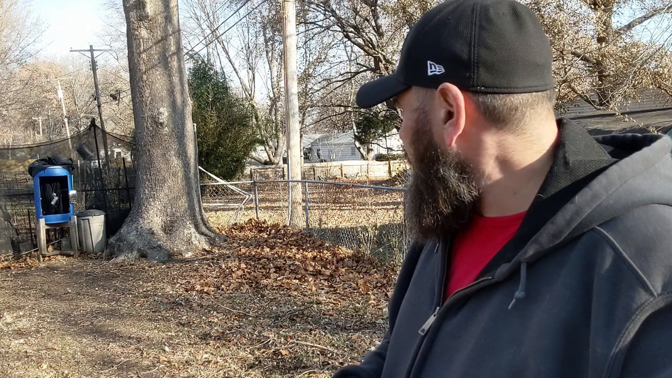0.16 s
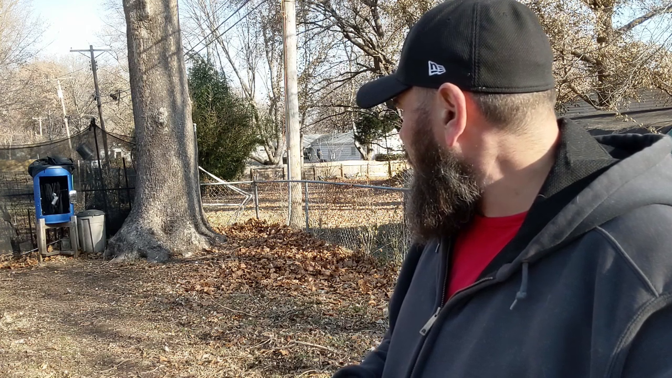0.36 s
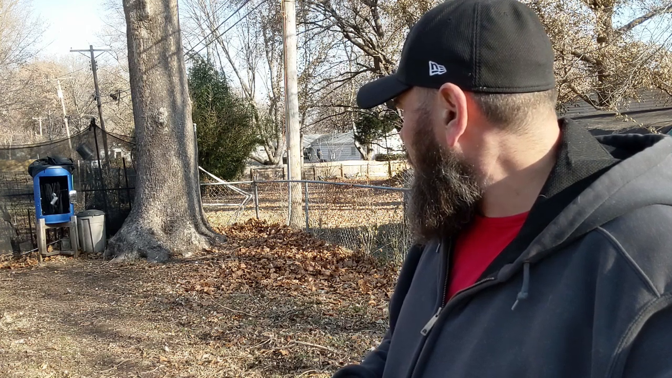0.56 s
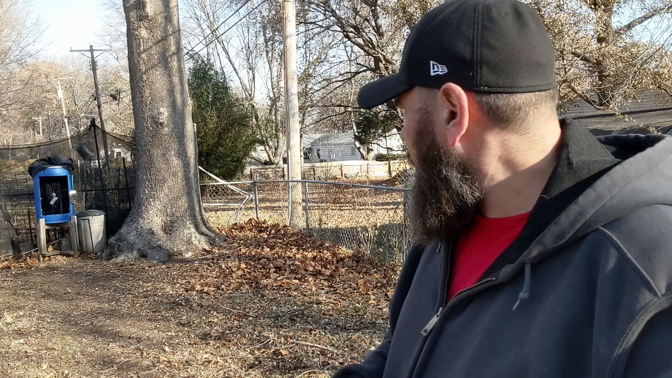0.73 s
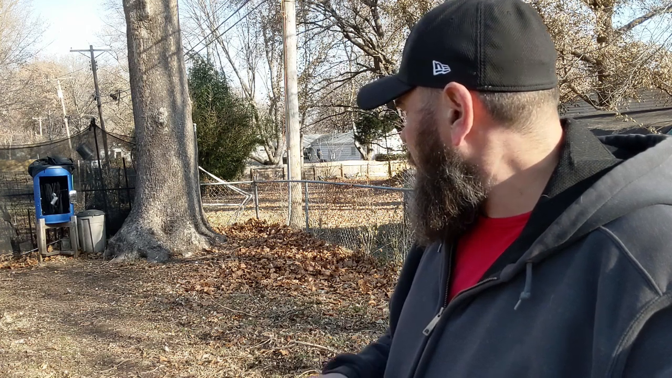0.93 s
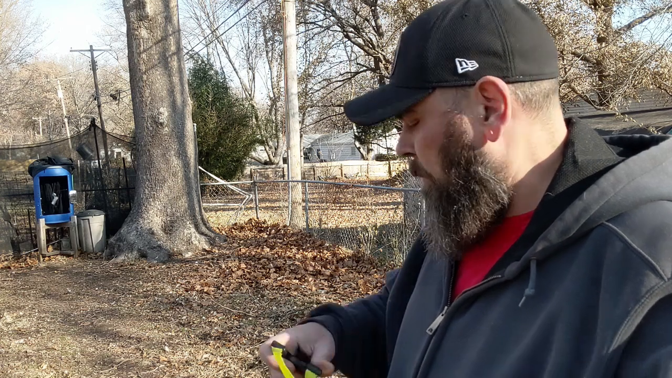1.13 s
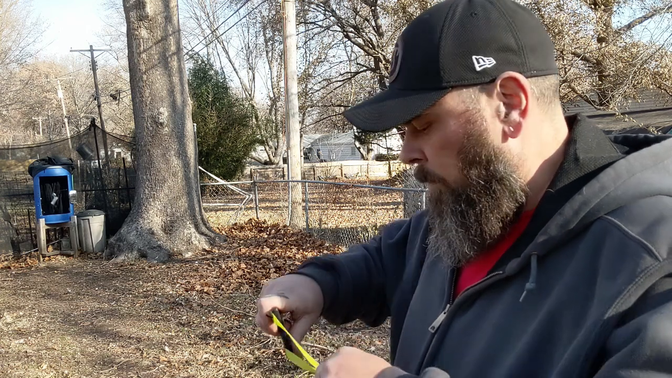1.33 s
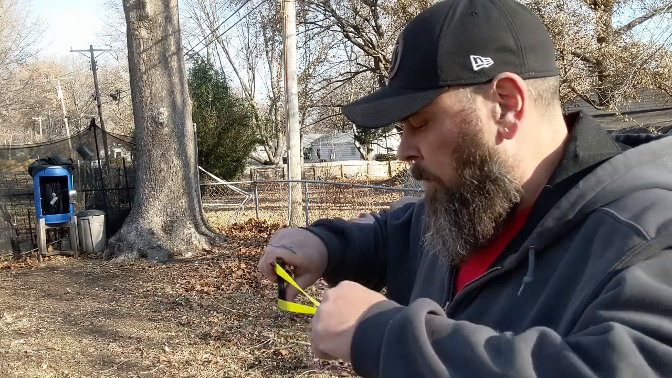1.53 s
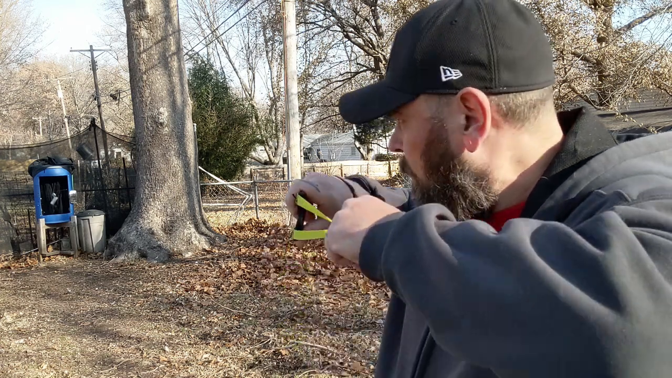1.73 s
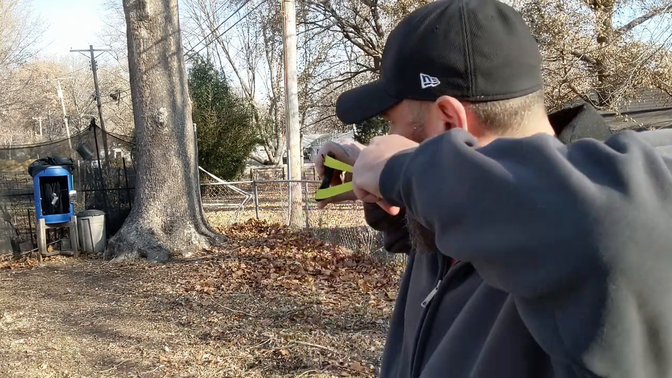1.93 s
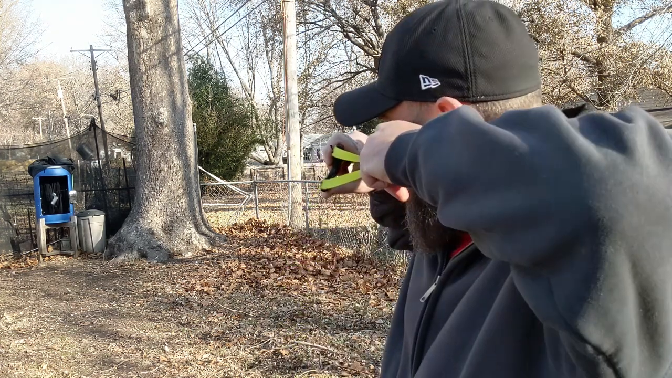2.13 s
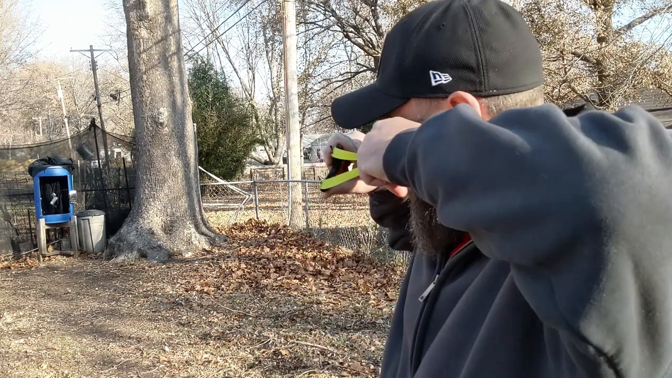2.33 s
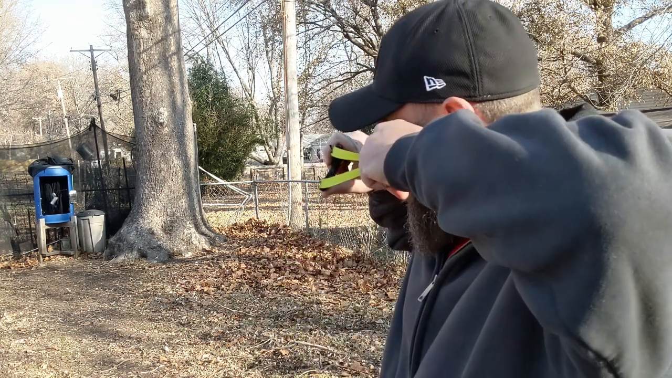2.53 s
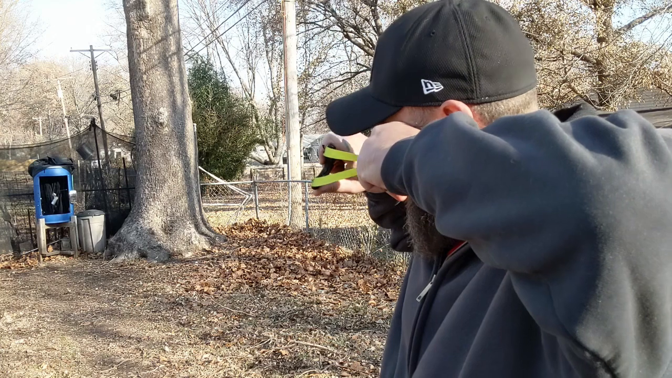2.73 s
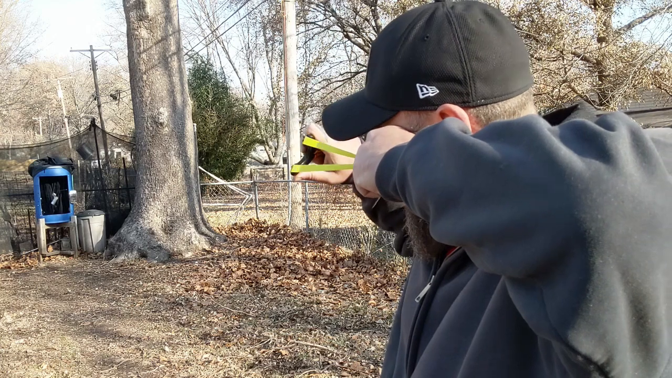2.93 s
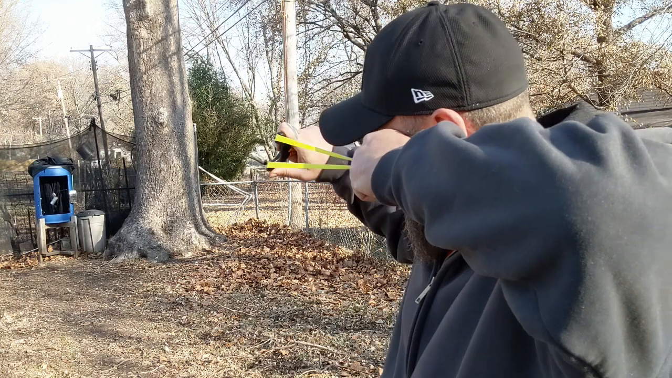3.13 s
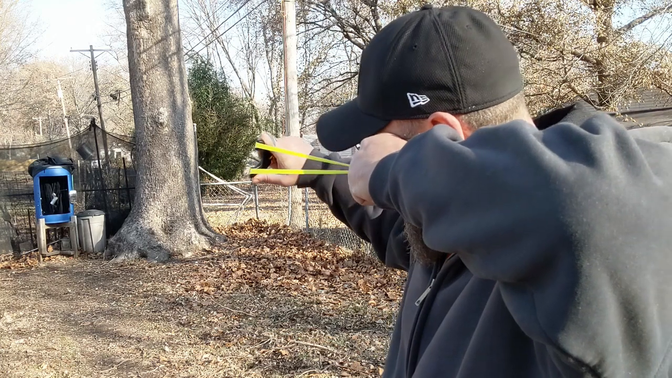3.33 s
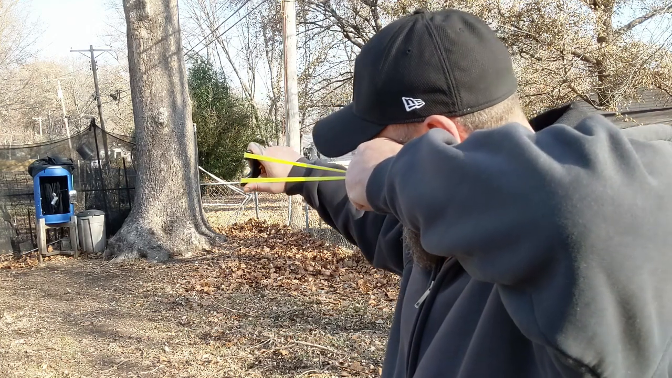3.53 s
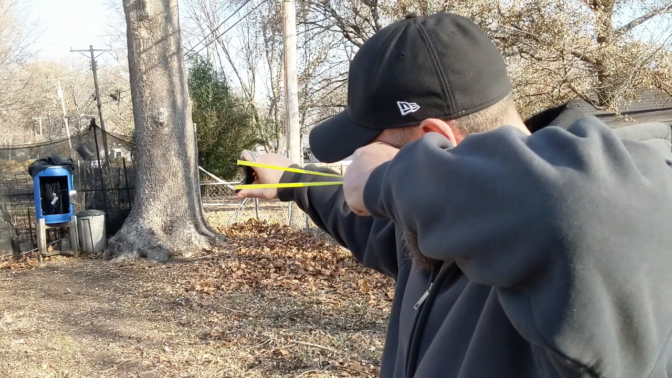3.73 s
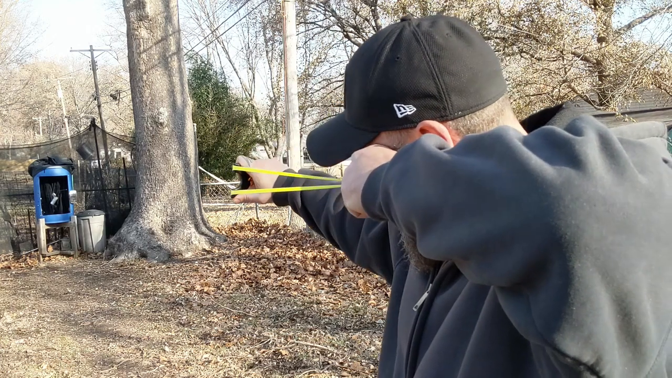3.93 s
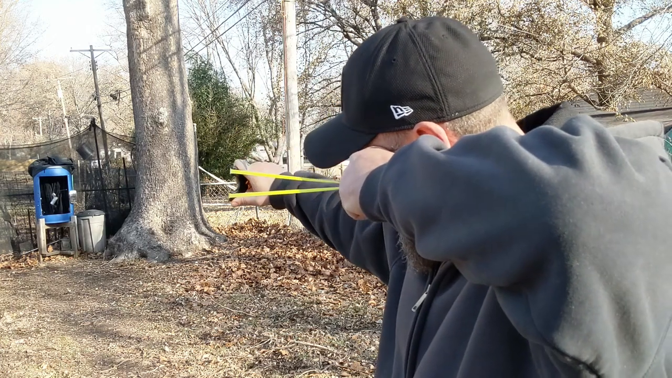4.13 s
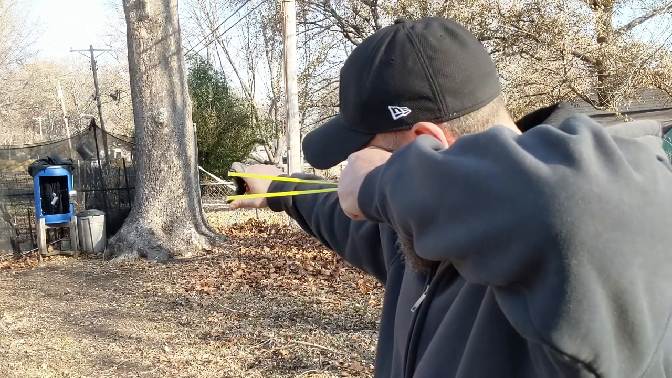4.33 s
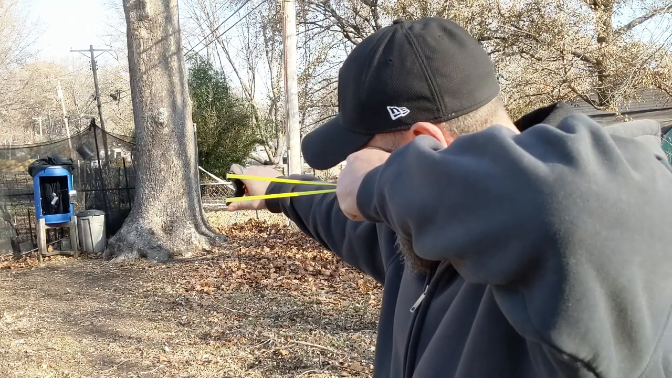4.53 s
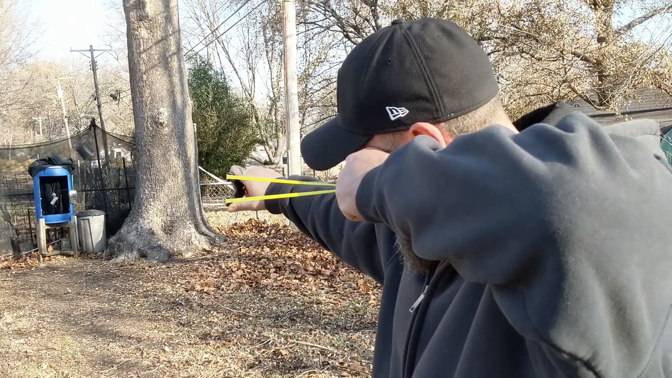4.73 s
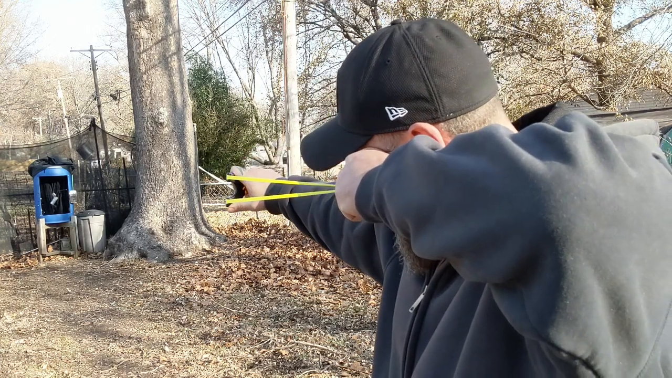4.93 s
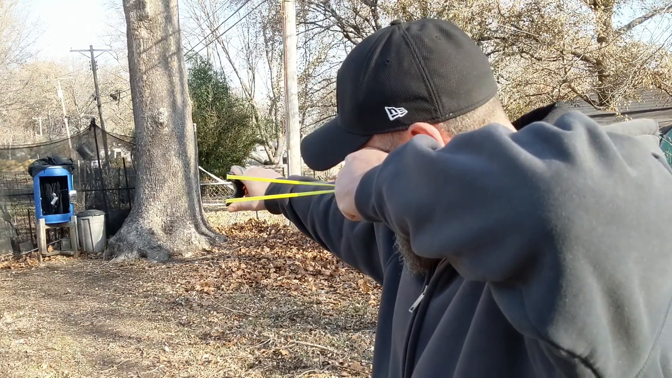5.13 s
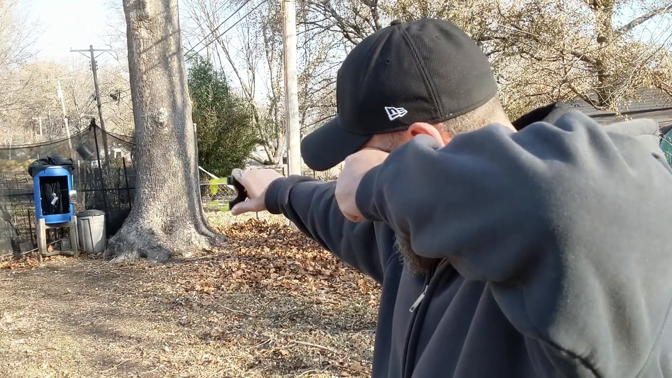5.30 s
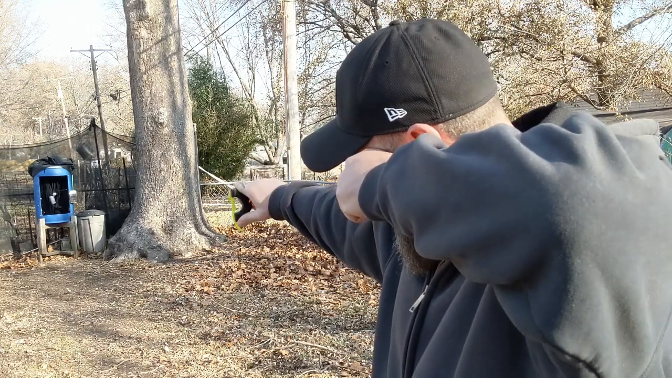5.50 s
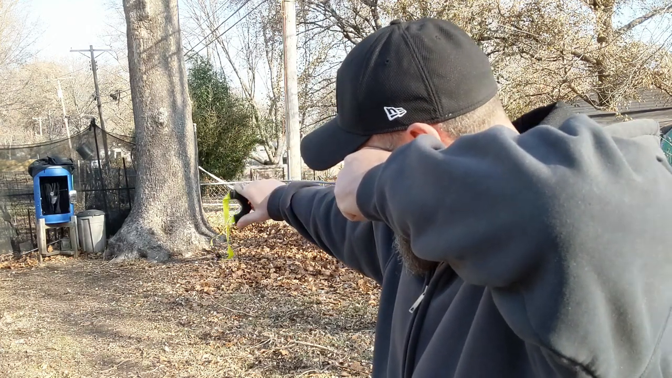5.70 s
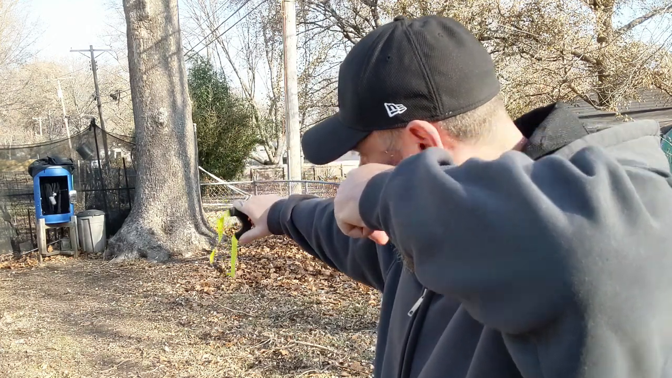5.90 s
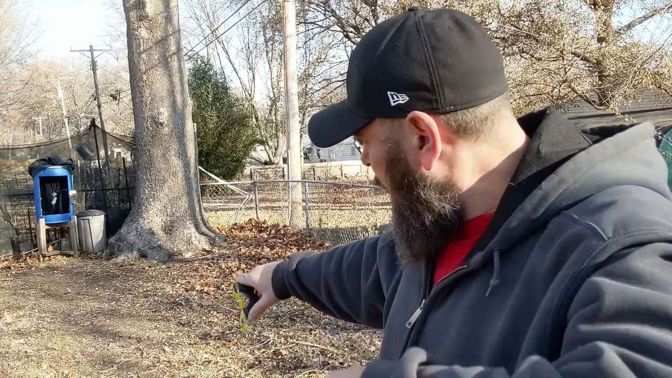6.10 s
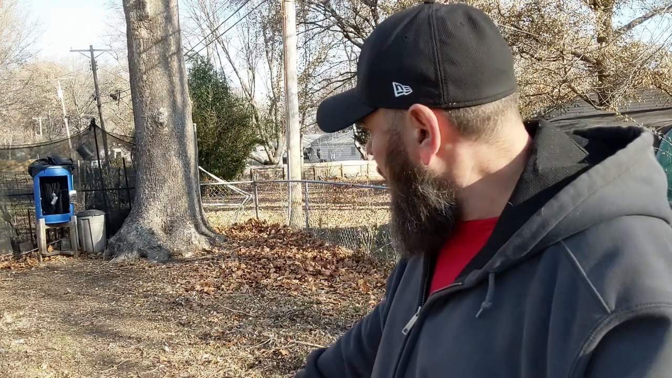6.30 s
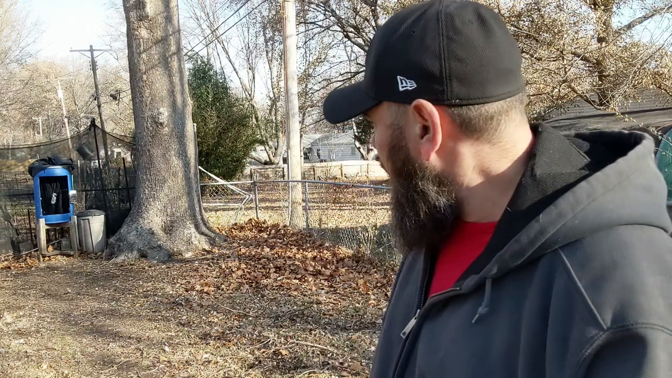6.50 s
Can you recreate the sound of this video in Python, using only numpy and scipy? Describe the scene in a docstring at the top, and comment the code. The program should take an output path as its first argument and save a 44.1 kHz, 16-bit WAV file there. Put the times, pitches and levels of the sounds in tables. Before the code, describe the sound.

A slingshot snaps close by and its ball cracks on a metal can, which keeps clinking, over a distant propeller plane.

```python
"""A far propeller plane drones over a back yard, with distant traffic, airy hiss and a thin far tone.
Close to the camera's stereo microphone a man draws a slingshot, his jacket rustling. The bands whip
forward and slap the fork, the steel ball cracks on a hanging can, and the swinging can goes on knocking
inside its plastic box, echoed by fences and houses. The camera turns its gain down after loud peaks."""
import sys
import numpy as np
from scipy import signal
from scipy.fft import rfft, irfft, next_fast_len
from scipy.io import wavfile
from scipy.ndimage import uniform_filter1d, map_coordinates

SR = 44100
rng = np.random.default_rng(int(sys.argv[2]) if len(sys.argv) > 2 else 0)


def write(x):
    x = np.atleast_2d(x).T
    wavfile.write(sys.argv[1], SR, np.round(np.clip(x, -1, 1) * 32767).astype(np.int16))

N = 289296
TIME = np.arange(N) / SR


def amp(db):
    """Gain of a level in dB."""
    return 10 ** (np.asarray(db) / 20)


def unit(x):
    """Scaled to rms 1."""
    return x / np.sqrt(np.mean(x ** 2) + 1e-20)


def along(points, hz):
    """Interpolate (Hz, value) points on a log axis."""
    freqs, values = np.transpose(points)
    return np.interp(np.log(hz + 1), np.log(freqs + 1), values)


def curves(rows):
    """One value per sample for each column after the time."""
    times, *columns = np.transpose(rows)
    return [np.interp(TIME, times, column) for column in columns]


def wobble(rate):
    """A smooth random curve, rate knots a second."""
    return map_coordinates(rng.standard_normal(int(N * rate / SR) + 4), [TIME * rate])


def filtered(x, response):
    """x through a complex frequency response."""
    n = x.shape[-1]
    size = next_fast_len(n + min(n, SR // 2))
    return irfft(rfft(x, size) * response(np.fft.rfftfreq(size, 1 / SR)), size)[..., :n]


def resonance(f, hz, width_hz, db):
    """Response of one resonance at frequencies f."""
    return amp(db) * 1j * f * width_hz / (hz * hz - f * f + 1j * f * width_hz)


def noise(spectrum, likeness, patchy_db):
    """Stereo noise of rms 1 in patches of random gain, from (Hz, dB) and (Hz, left-right correlation)."""
    def mid_side(hz):
        angle = np.arccos(np.clip(along(likeness, hz), -1, 1)) / 2
        return amp(along(spectrum, hz)) * [np.cos(angle), np.sin(angle)]
    white = signal.stft(rng.standard_normal((2, N)), nperseg=512)[2]
    patches = uniform_filter1d(rng.standard_normal(white.shape[1:]), size=6, axis=0)
    patches = unit(uniform_filter1d(patches, size=14, axis=1))
    pair = signal.istft(white * amp(patchy_db * patches), nperseg=512)[1][:, :N]
    mid, side = filtered(pair, mid_side)
    return unit(np.array([mid + side, mid - side]))


def burst(start, db, hold, t60, rise):
    """Envelope of one contact: rise, hold, decay; times in seconds."""
    out, first = np.zeros(N), int(np.ceil(start * SR))
    t = np.arange(first, min(N, first + int((hold + 2 * t60) * SR))) / SR - start
    out[first:first + len(t)] = amp(db - 60 * np.maximum(t - hold, 0) / t60) * (1 - np.exp(-t / rise))
    return out


def ring(modes, start, db, spread):
    """Struck, damped modes, each blow a little different in strength and pitch."""
    out, t = np.zeros(N + SR), np.arange(SR // 4) / SR
    attack = 1 - np.exp(-t / 0.00091)
    for hz, mode_db, t60 in modes:
        wave = np.sin(2 * np.pi * hz * rng.normal(1, spread) * t + rng.uniform(0, 2 * np.pi))
        decay = amp(db + mode_db + rng.normal(0, 1.9) - 60 * t / t60)
        out[round(start * SR):][:len(t)] += attack * decay * wave
    return out[:N]


def right_first(left, right):
    """Stereo pair reaching the left capsule 6 samples late."""
    return np.array([np.pad(left, (6, 0))[:N], right])


def traffic_and_air():
    """Far traffic rumbles under the hiss of the yard."""
    # Spectra of rumble and hiss: freq_hz, level_db
    traffic = [(15, -28), (30, -8), (60, -7), (85, -12), (120, -13.5), (180, -21), (260, -19), (330, -22.5),
               (410, -19), (600, -27), (750, -27.5), (920, -27.5), (1200, -35), (1600, -38), (2200, -71.5)]
    air = [(900, -33.5), (1550, -1.5), (2100, -7.5), (2700, -9.5), (3200, -7.5), (4700, -20), (5700, -21),
           (6600, -27), (8600, -28), (12500, -33), (15300, -29.5), (15900, -34), (16400, -50)]
    # Likeness of the two channels: freq_hz, correlation
    likeness = [(60, 1), (150, 1), (380, 0.23), (950, 0.26), (2380, -0.068), (5980, -0.091), (15000, -0.11)]
    rumble = amp([[-37.8], [-36.2]]) * noise(traffic, likeness, patchy_db=0.32)
    return rumble + amp(-56.5 + 0.73 * wobble(3.12)) * noise(air, likeness, patchy_db=1.1)


def far_whine(pitch_hz=2250, flicker_db=1.8):
    """A thin far tone swells and flickers."""
    # Swells: time_s, level_db
    swells = [(0.0, -71), (0.85, -71.5), (1.05, -62.5), (1.2, -62), (1.35, -70), (1.49, -60.5), (1.63, -68),
              (2.0, -70), (2.07, -59), (2.16, -74), (2.27, -75), (2.33, -62), (2.42, -68), (2.47, -61),
              (2.8, -71), (2.94, -61), (3.12, -61), (3.5, -73), (3.75, -69), (3.95, -60), (4.13, -68.5),
              (4.78, -70.5), (4.9, -59), (5.02, -67.5), (6.56, -67)]
    tone = np.sin(2 * np.pi * pitch_hz * TIME + 0.88 * wobble(9.9))
    return amp(curves(swells)[0] + flicker_db * wobble(12)) * tone


def plane():
    """The blade tone sinks as the plane leaves; turbulent air makes it flutter."""
    # Flight: time_s, pitch_hz, level_db, second_harmonic_relative_db
    flight = [(0.0, 100.6, -24, -23), (0.3, 101.1, -24, -19.5), (0.7, 101.5, -24, -23.5),
              (1.2, 100.3, -25, -30.5), (1.51, 100.6, -22.5, -30), (2.21, 98.83, -25, -31),
              (2.6, 99.37, -23.5, -32), (2.9, 98.8, -24.5, -20), (3.2, 98.23, -26.5, -30),
              (3.6, 98.25, -27, -30), (4.05, 98, -27, -25), (4.25, 97.8, -27, -19),
              (4.84, 96.95, -25, -21.5), (5.35, 96.45, -28.5, -21), (5.92, 96.1, -32.5, -30),
              (6.56, 95.9, -33.5, -30)]
    # Third and fourth harmonics, drifting on their own: relative_db
    overtones = [-28, -32]
    hz, db, second_db = curves(flight)
    phase = 2 * np.pi * np.cumsum(hz) / SR
    levels = [db, db + second_db] + [db + under + 4 * wobble(2.45) for under in overtones]
    tone = np.zeros(N)
    for harmonic, level in enumerate(levels, 1):
        gain = amp(level + 0.48 * wobble(7.6) + 0.8 * wobble(40))
        tone += gain * np.sin(harmonic * (phase + 0.41 * wobble(8) + 0.14 * wobble(25)))
    return right_first(amp(-0.6) * tone, amp(0.65) * tone)


def jacket():
    """Cloth rustles in fine grains and swells as the arms move."""
    # Sleeve rubs: start_s, hold_s, level_db
    moves = [(0.63, .05, -77), (1.67, 0.29, -73), (3.575, 0.19, -82), (4.42, 0.087, -72)]
    cloth = noise([(3000, -28.5), (6000, 0), (9500, 1.5), (15000, -6)], [(9000, 0.082)], patchy_db=2)
    rubs = sum(burst(start, db, hold, t60=0.53, rise=.03) for start, hold, db in moves)
    rustle = amp(-78.5 + 2 * wobble(4.3))
    return (rustle + rubs) * unit(amp(2 * wobble(150)) * cloth)


def clicks():
    """Small clicks from the shooter: puffs of noise through two resonances."""
    # Clicks: start_s, puff_db, pitch_hz
    ticks = [(0.341, -54, 5740), (0.629, -44, 8500), (0.6554, -42, 5750), (0.682, -49, 5480),
             (1.2068, -52, 5590), (3.5789, -45, 5044), (4.4443, -41, 9510), (4.4997, -51, 5410)]
    out, length = np.zeros((2, N)), SR // 20
    for start, db, hz in ticks:
        span = slice(int(start * SR), int(start * SR) + length)
        envelope = burst(start, db, hold=0.00092, t60=0.0074, rise=.0003)[span]
        puff = envelope * rng.standard_normal((2, length))
        out[:, span] += filtered(puff, lambda f: resonance(f, hz, 1200, 0)
                                 - resonance(f, 1.8 * hz, 3000, -9))
    return out


def band_snap(snap_s=5.364):
    """Close up, the bands whip forward in a rising hiss and slap the fork several times."""
    # Bands and pouch on the fork: start_s, level_db, length_s, left_minus_right_db, dull_relative_db
    slaps = [(5.3646, -22, .002, 0, 4), (5.3664, -9, .0015, 1, -4), (5.371, -14, .0012, 0, -10),
             (5.3727, -10.5, .0022, 0, -12), (5.3795, -22, .002, 0, -10), (5.383, -35, .0015, 0, 13),
             (5.3885, -28, .001, 5, -15), (5.394, -34, .002, 1, -6), (5.3975, -30, .0015, 0, -15),
             (5.403, -32, .001, 4, -10)]
    # Bright rubber spectrum: freq_hz, level_db
    rubber = [(2000, -11.5), (3500, -1.5), (5000, -9), (6000, -8), (8000, -7), (12000, -9), (16500, -19)]
    bright = noise(rubber, [(8000, 0.15)], patchy_db=-0.5)
    dull = noise([(300, -15), (800, -0.5), (2500, -1.5), (4000, -25), (16000, -62)],
                 [(1000, 0.24)], patchy_db=4)
    swell = amp(-40 - 1980 * np.abs(TIME - snap_s)) * (TIME < snap_s)
    whip = swell + burst(snap_s, -31, hold=0.009, t60=0.28, rise=0.0027)
    out = whip * (bright + amp(-2) * dull)
    for start, db, length, pan_db, dull_db in slaps:
        slap = burst(start, db, hold=length / 2, t60=1.6 * length, rise=0.00034)
        out += amp([[pan_db / 2], [-pan_db / 2]]) * slap * (bright + amp(dull_db) * dull)
    return out


def band_twang(slack_s=5.3765, start_hz=1900, halving_s=.0075):
    """The band's pitch dives as it goes slack."""
    hz = start_hz * .5 ** (np.maximum(TIME - slack_s, 0) / halving_s)
    envelope = burst(slack_s, -23.5, hold=0.0062, t60=0.041, rise=0.0011) * amp(4.4 * wobble(300))
    return envelope * np.sin(2 * np.pi * np.cumsum(hz) / SR)


def gust():
    """The pressure jolt of the release shoves the diaphragms, which swing slowly back through rest."""
    shove = np.exp(-((TIME - 5.367) / .0005) ** 2)
    t = np.clip(TIME - 5.3677, 0, 1)
    rise = 1 - .5 * np.exp(-t / .0009) - .5 * np.exp(-t / .008)
    swing = -(1 - (t / .044) ** 1.5) * np.exp(-(t / .075) ** 2) * rise
    return amp([[-4], [1]]) * swing + np.array([[-.6], [.7]]) * shove


def box_knocks():
    """The swinging can clinks against its plastic box and sounds the box's modes."""
    # Knocks: start_s, level_db, hollow_relative_db
    knocks = [(5.887, -23, -1), (5.9767, -24, -2), (6.0565, -30.5, -3.5), (6.1, -48, -2), (6.1395, -40, -1),
              (6.1516, -32, -2), (6.1863, -46, 4), (6.2178, -52, 7), (6.2504, -36.5, -2), (6.267, -48, -13),
              (6.306, -43, 1.5), (6.3295, -48.5, 2), (6.34, -51, -1), (6.3623, -38.5, 0),
              (6.4588, -30.5, -9.5), (6.531, -40.5, -1)]
    # Contact spectrum: freq_hz, level_db
    contact = [(700, -24), (1500, -9), (2800, -7.5), (4600, -4.5), (5800, -7), (7000, -9.5), (9700, -15),
               (11000, -23), (16000, -60)]
    # Box modes, three hollow then three bright: pitch_hz, level_db, t60_s
    modes = [(1020, -2.5, 0.041), (1333, -0.5, 0.035), (1610, 0.5, 0.04), (5680, -3, 0.014),
             (6030, 6.5, 0.013), (7500, -6.5, 0.016)]
    clink = noise(contact, [(6000, 0.62)], patchy_db=0)
    edge = noise([(9000, -25), (11000, 0), (13000, -4), (16000, -20)], [(6000, .6)], patchy_db=1.5)
    out = np.zeros((2, N))
    for start, db, hollow_db in knocks:
        out += burst(start, db, hold=0.0011, t60=0.04, rise=0.00091) * (clink + amp(-21) * edge)
        out += ring(modes[:3], start, db + hollow_db, spread=0.053)
        out += ring(modes[3:], start, db + .5, spread=0.039)
    return out


def can_strike():
    """The ball cracks on the can: its thin, dented wall buzzes and rings, and the box takes the blow."""
    # Ball on can: start_s, level_db, rattle_s, t60_s
    strikes = [(5.5376, -10.5, .006, .028)]
    # Spectra of crack, wall buzz and box thud: freq_hz, level_db
    crack_spectrum = [(150, -29), (300, -11), (600, -12), (1000, -1), (1700, 0.5), (3500, -1), (4700, -7),
                      (5700, -6.5), (6600, -9), (8000, -3.5), (11000, -5.5), (14000, -7), (16500, -22)]
    buzz_spectrum = [(300, -10), (800, -6), (2000, -7), (4000, 6), (5000, -6), (8000, -4.5), (14000, -18)]
    thud_spectrum = [(90, -12), (150, -2), (350, 1), (700, -9), (1200, -21)]
    # Can modes: pitch_hz, level_db, t60_s
    modes = [(924.6, -0.5, 0.055), (830, -4.5, 0.067), (1127, -18.5, 0.43), (1170, -8, 0.07),
             (1230, -13, 0.054), (1350, -23, 0.31), (1995, -6, 0.032), (5100, -12, 0.02),
             (5650, -2.5, 0.04), (5830, 2.5, 0.022), (5830, -.5, 0.026), (6180, 0.5, 0.036),
             (6960, -4, 0.029), (7510, -10, 0.03), (10120, 1, 0.028), (12500, -11, 0.028)]
    crack = noise(crack_spectrum, [(1000, 0.8), (6000, 0.26)], patchy_db=2)
    buzz = noise(buzz_spectrum, [(1000, 0.67), (6000, 0.27)], patchy_db=0.5)
    thud = noise(thud_spectrum, [(300, 0.84)], patchy_db=1.5)
    out = np.zeros((2, N))
    for start, db, rattle, t60 in strikes:
        out += burst(start, db, rattle, t60, rise=.001) * crack
        out += burst(start, db - 11, rattle, t60=0.24, rise=0.0022) * buzz
        out += burst(start, db - 19.5, rattle, t60=.05, rise=0.0022) * thud
        out += ring(modes, start, db - 2.5, spread=0.0036)
    return out


def yard_echo(direct):
    """Fences and houses echo; trees scatter a diffuse tail that lasts longest in the midrange."""
    # Reflections: delay_s, level_db
    walls = [(0.019, -17), (.094, -26), (.135, -42), (0.226, -40)]
    # Decay of the tail: freq_hz, t60_s
    decay = [(500, 0.26), (1200, 0.86), (2500, 0.86), (6000, 0.56), (14000, 0.36)]
    hz, t, spectra = signal.stft(direct, SR, nperseg=256)
    power = uniform_filter1d(np.abs(spectra) ** 2, size=7, axis=1)
    fade = amp(-60 * t[:200] / along(decay, hz)[:, None]) ** 2
    fade[:, 0] = 0  # scattered sound comes after the direct sound
    fade /= fade.sum(axis=1, keepdims=True)
    scattered = signal.fftconvolve(power, fade[None], axes=2)[..., :len(t)]
    white = signal.stft(rng.standard_normal((2, N)), nperseg=256)[2]
    white /= np.sqrt(np.mean(np.abs(white) ** 2))
    tail = signal.istft(np.sqrt(np.abs(scattered)) * white, nperseg=256)[1][:, :N]
    echoes = sum(amp(db) * np.pad(direct, ((0, 0), (round(delay * SR), 0)))[:, :N] for delay, db in walls)
    return amp(-12.5) * tail + echoes


def scene():
    """All sources at the microphone; only the can and its box echo."""
    left, right = can_strike() + box_knocks()
    hits = right_first(amp(1.5) * left, right)
    shot = hits + yard_echo(hits) + band_snap() + band_twang() + gust()
    return shot + plane() + traffic_and_air() + far_whine() + jacket() + clicks()


def record(dry, threshold_db=-14, recovery_db_per_s=7, top_hz=16500):
    """The microphone ports colour the treble; loud peaks pull the gain down at once and it creeps back."""
    # Cavities before the capsules: centre_hz, width_hz, level_db
    ports = [(5705, 580, 1.5), (7500, 540, -2.5), (9530, 500, -2), (11800, 600, -0.5)]
    coloured = filtered(dry, lambda hz: 1 + sum(resonance(hz, *port) for port in ports))
    peak_db = 20 * np.log10(np.abs(coloured).max(axis=0) + 1e-9)
    wanted_cut_db = 0.31 * np.maximum(peak_db - threshold_db, 0)
    regained_db = recovery_db_per_s * TIME
    cut_db = np.maximum.accumulate(wanted_cut_db + regained_db) - regained_db
    ducked = coloured * amp(-uniform_filter1d(cut_db, size=90))
    soft_clipped = ducked / (1 + np.abs(ducked) ** 8) ** (1 / 8)
    return filtered(soft_clipped, lambda hz: 1 / (1 + (hz / top_hz) ** 80))


dry = scene()
out = record(dry)
write(out)
```